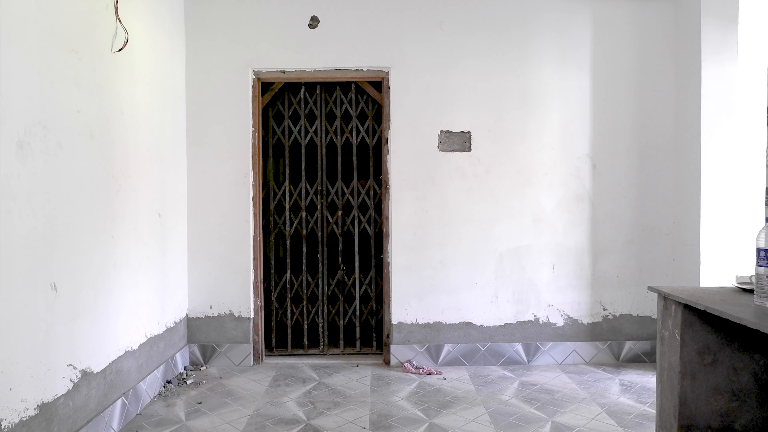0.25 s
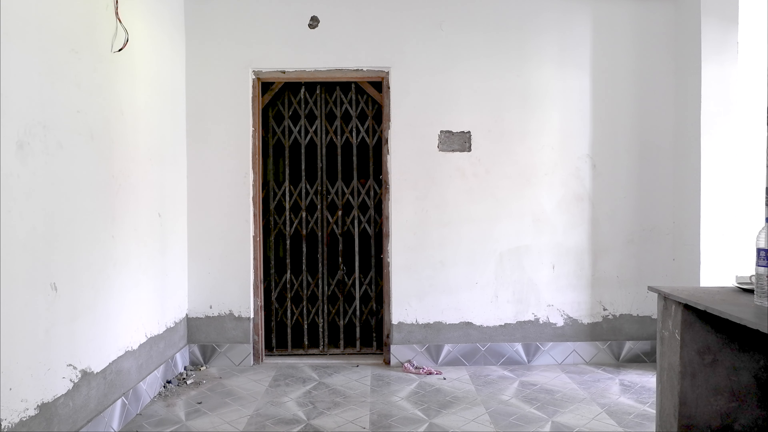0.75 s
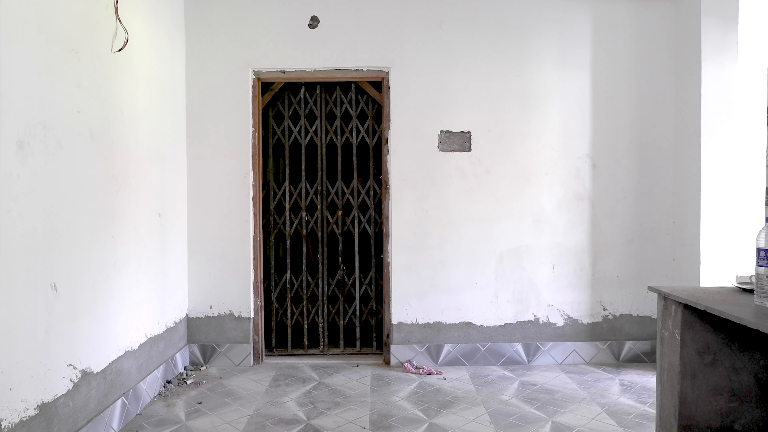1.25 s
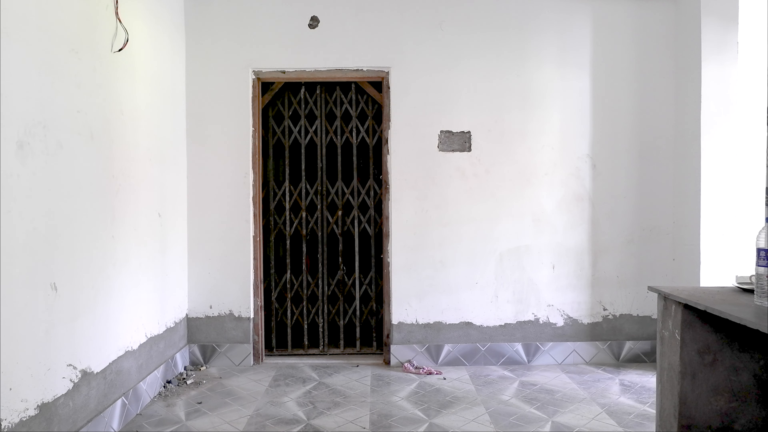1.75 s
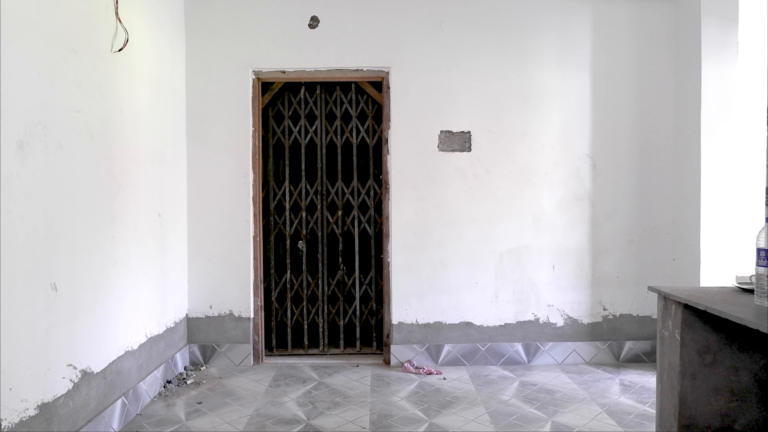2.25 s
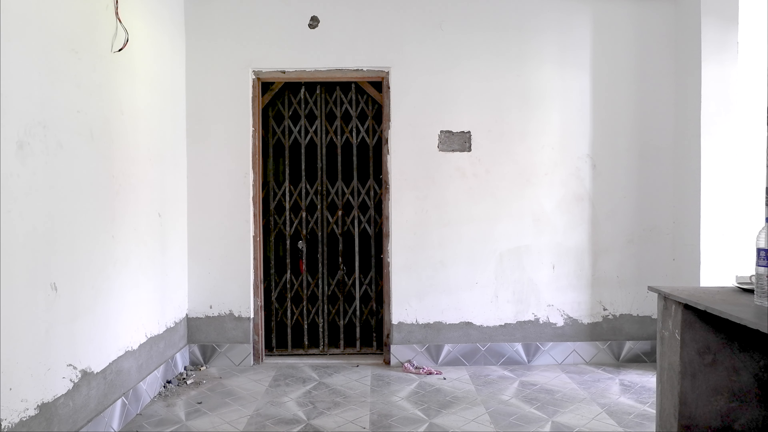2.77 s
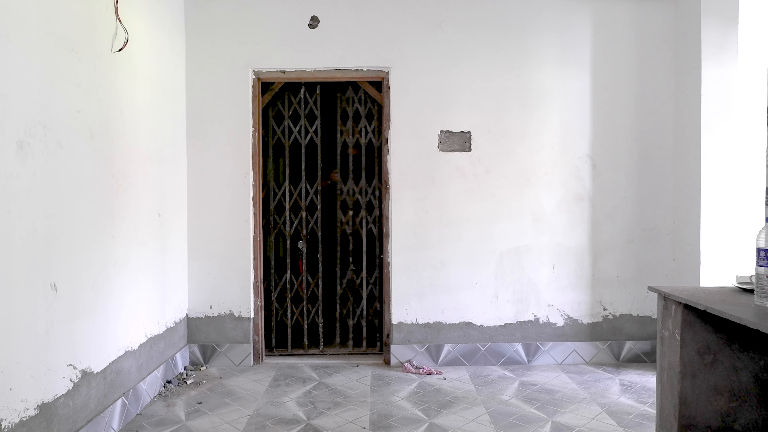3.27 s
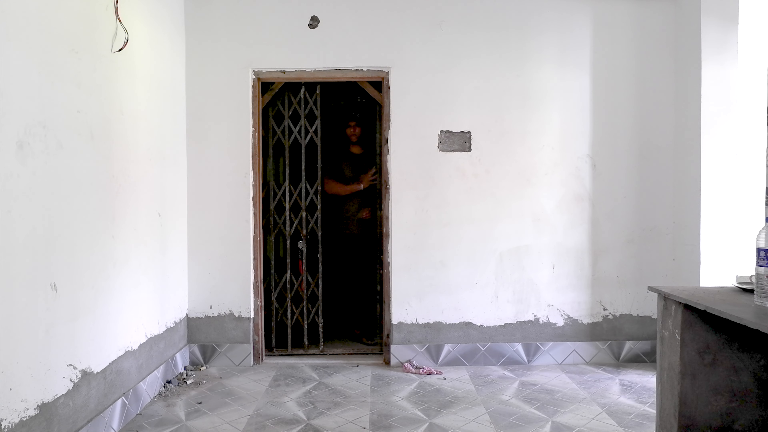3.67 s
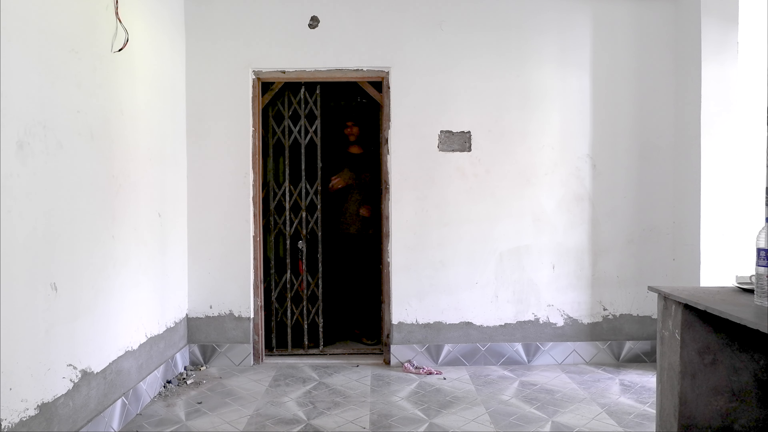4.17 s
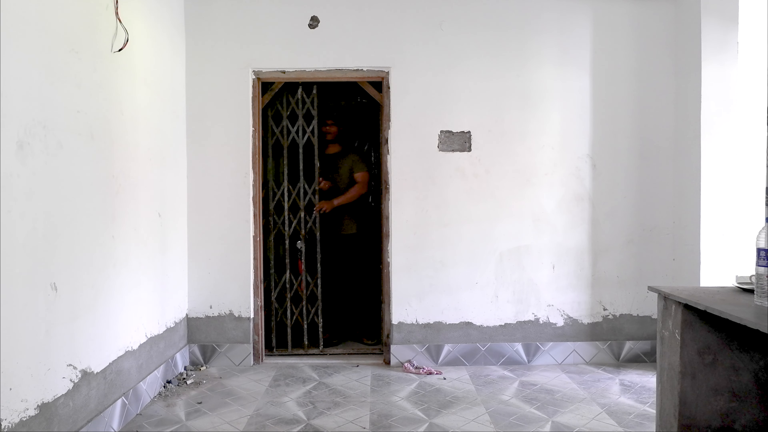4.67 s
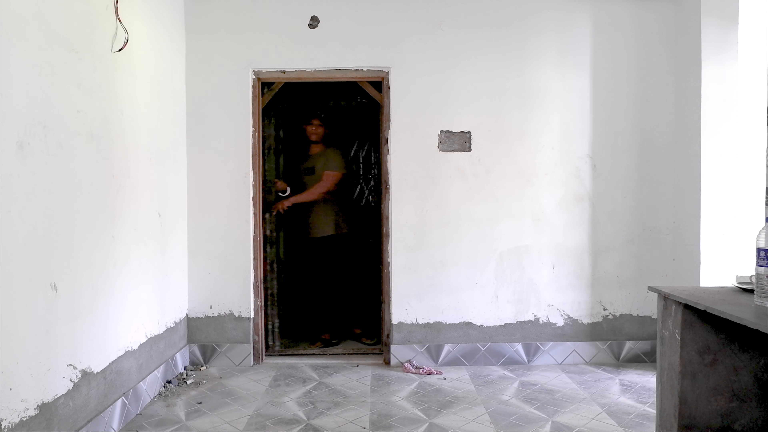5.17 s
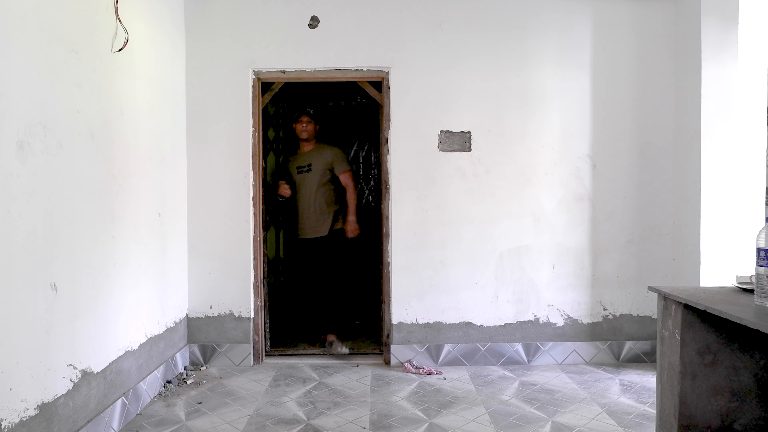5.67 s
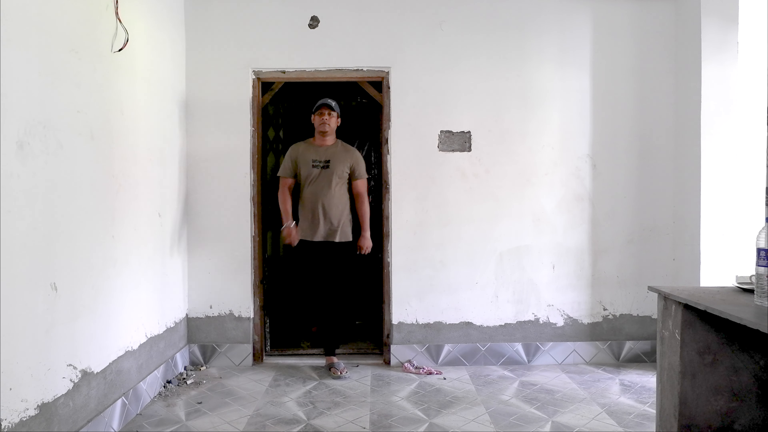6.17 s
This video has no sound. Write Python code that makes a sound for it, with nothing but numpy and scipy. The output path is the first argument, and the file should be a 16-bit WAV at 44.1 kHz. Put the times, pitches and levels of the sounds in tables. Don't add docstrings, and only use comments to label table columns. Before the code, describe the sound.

In a bare, hard-walled tiled room, a latch snaps with a bright metallic clack, followed by faint key ticks and pings. A bolt clacks, then a harder release bangs. After a lull, one leaf of a folding steel gate rattles along its rail and stops with a clank. The second leaf clatters louder, with a brief very high squeal, and slams. Light shoe scuffs end it. The stereo microphone stands back in the echoing room, over low hum and hiss.

```python
import sys
import numpy as np
from scipy import signal
from scipy.fft import rfft, irfft, next_fast_len
from scipy.io import wavfile
from scipy.ndimage import uniform_filter1d

SR = 44100
rng = np.random.default_rng(int(sys.argv[2]) if len(sys.argv) > 2 else 0)


def level_to_linear(level):
    exponent = np.asarray(level, float) / 20
    return 10 ** exponent


def wrap_up_sound(samples):
    columns = np.atleast_2d(samples).T
    tamed = np.clip(columns, -1, 1)
    steps = np.round(tamed * 32767).astype(np.int16)
    wavfile.write(sys.argv[1], SR, steps)


N = 283641

# frequency_hz, density_db
AIR_SPECTRUM = [(15, -71), (25, -26.5), (129, -6.5), (199, -6), (341, -8), (584, -9.5), (829, -11.5),
                (1000, -12), (1240, -15), (1460, -14.5), (1710, -17), (1860, -18), (3640, -21), (4060, -23),
                (15600, -33)]
# frequency_hz, side_minus_mid_db
AIR_SIDE = [(60, -16), (110, -23), (200, -29.5), (380, -20), (700, -17.5), (1290, -12.5), (2380, -8),
            (4400, -2.5), (8120, 1.5), (15000, 1.5)]
# frequency_hz, side_minus_mid_db
GATE_SIDE = [(60, -29), (250, -23), (700, -19), (2800, -25), (5600, -22), (10000, -17), (15000, -22)]
# frequency_hz, t60_s
ROOM_T60 = [(150, 1), (500, 0.84), (1300, 0.68), (3500, 0.65), (9000, 0.55), (16000, 0.42)]
# start_s, length_s, level_db, centre_hz
SCUFFS = [
    (6.052, 0.18, -57, 7500),
    (6.214, 0.083, -50.5, 6000),
]
# start_s, peak_db, pitch_hz, t60_s
RINGS = [ (.575, -49, 10155, .8), (.575, -55, 8255, 1.2), (.575, -62, 10710, 1.1), (.86, -62, 10105, .5),
         (.87, -61, 10710, .8), (1.44, -65, 10250, 1.4), (1.681, -50, 12155, .4), (1.681, -50, 8300, .3),
         (2.2, -54, 10220, .7), (2.482, -47, 10145, .4), (2.482, -51, 8260, .9), (3.589, -50, 8400, .3),
         (4.03, -52, 8660, .7), (4.854, -52, 7640, .5)]
# start_s, peak_db, pitch_hz, t60_s
CLANKS = [(3.64, -45, 163, .5), (3.72, -42, 118, .45), (3.925, -42, 116, .45), (4.09, -52, 125, .35),
          (5.045, -51, 1100, .25), (5.07, -43, 420, .35), (5.1, -50, 690, .35), (5.19, -48, 270, .25),
          (5.26, -47, 335, .35), (5.46, -46, 1080, .35), (5.5, -53, 120, .6)]

SLAMS = [
    (0.1185, -27, 2440, -2),
    (0.1323, -22.5, 3020, -27),
    (1.6716, -35.5, 2750, -39),
    (1.6811, -24.5, 3750, -54),
    (1.889, -37.5, 3170, -40),
    (2.004, -30, 3484, -22),
    (2.0113, -18.5, 3070, -11.5),
    (2.039, -32.5, 4200, -28),
    (3.8119, -25.5, 3350, -15),
    (5.475, -29, 2850, -11.5),
]
CLICKS = [ (0.4062, -49.5, 2440, 4), (0.414, -41.5, 4740, -42), (0.5787, -39, 4260, -32),
          (0.9267, -42.5, 3720, -9), (2.2002, -35, 3830, -1), (2.481, -50, 3670, 8),
          (3.5898, -30, 3750, -21), (4.0693, -54.5, 2540, 8), (4.8297, -41, 3780, -22),
          (4.8533, -45.5, 3980, 0), (5.0485, -33.5, 4240, -39), (5.105, -34.5, 3350, -12),
          (5.3116, -36.5, 3220, 5), (5.4552, -26.5, 5650, -23), (5.793, -49.5, 2960, -18)]
KNOCKS = [
    (2.37, -44, 5400, 4.5),
    (3.39, -48, 2660, -30),
    (4.4, -49.5, 1300, 7),
    (3.86, -40.5, 3700, -20),
    (6.235, -54, 2700, 3),
]
TAPS = [
    (.82, -51.5, 4240, -14),
    (.861, -56, 4225, 3),
    (0.891, -53, 4200, -12),
    (.93, -43, 4240, -28),
    (1.126, -54.5, 4680, -29),
    (1.17, -54.5, 4160, -15),
    (1.219, -61, 4630, -27),
    (3.135, -51.5, 4930, -30),
    (3.17, -46.5, 4160, -23),
    (5.793, -46.5, 4330, -4),
]
THUDS = [
    (2.035, -37, 4220, -40),
    (5.09, -50, 4270, -34),
    (5.4, -32.5, 2960, -7),
]
LATCHES = [
    (0.1225, -36.5, 2930, 7),
    (0.128, -27.5, 2700, -40),
    (.416, -48, 4970, -40),
    (0.443, -46, 2430, -40),
    (.59, -43.5, 2485, -40),
]
TOUCHES = [
    (0.073, -47.5, 6250, 4),
    (.098, -41.5, 3000, 3),
    (0.553, -43.5, 3900, -18),
    (1.652, -56.5, 4230, 4),
    (1.981, -38.5, 3970, -12),
    (4.79, -49.5, 4060, -10),
]

# time_s, level_db
SLIDES = [
    [(.41, -51.5), (.56, -57)],
    [(2.14, -40), (2.212, -41.5), (2.346, -43.5), (2.408, -39.5), (2.46, -63)],
    [(3.09, -65), (3.162, -55.5), (3.34, -47), (3.416, -40.5), (3.63, -38.5), (3.8, -42.5), (3.9, -44.5),
     (4.014, -55), (4.1, -81)],
    [(4.2, -53.5), (4.22, -52.5), (4.32, -62.5)],
    [(4.39, -49), (4.412, -47), (4.5, -53.5)],
    [(4.82, -48.5), (5.006, -49.5), (5.1, -33), (5.2, -39.5), (5.284, -35.5), (5.4, -36.5), (5.47, -47.5),
     (5.52, -60)],
    [(5.85, -65), (6.1, -63.5), (6.22, -59.5)],
]
# start_s, level_db
JOLTS = [
    (3.584, -42),
    (3.809, -27.5),
    (5.094, -41),
    (5.22, -30.5),
    (5.388, -25.5),
]
FOLDS_S = [
    2.14,
    3.12,
    5.5,
]
# start_s, end_s, frame_db
LOADS = [
    (2.33, 2.42, -10),
    (3.37, 3.56, -7),
    (3.62, 3.74, -7),
    (3.82, 3.94, -11),
    (4.4, 4.467, -7),
    (5.03, 5.12, -11),
    (5.18, 5.32, -11),
    (5.39, 5.48, -7),
]
# start_s, end_s, level_db
BOOMS_FIRST = [
    (3.6, 3.93, -53.5),
]
# start_s, end_s, level_db
BOOMS_SECOND = [
    (5.04, 5.147, -46.5),
    (5.201, 5.327, -49.5),
    (5.39, 5.466, -54.5),
]
# frequency_hz, width_hz, level_db
RAIL_FIRST = [(138, 30, -0.5), (353, 210, 0)]
# frequency_hz, width_hz, level_db
RAIL_SECOND = [(110, 15, 0.81), (330, 37, -0.85), (403, 130, -0.6), (694, 140, 0.17)]
# frequency_hz, width_hz, level_db
LATTICE = [(2700, 660, -4.5), (4600, 430, -2.5)]
# frequency_hz, density_db
RATTLE = [(940, -57), (1600, -12), (2000, -3), (2320, -3.5), (2710, 2), (3590, 5), (4450, 8), (5520, 9),
          (8000, 6), (10400, -14), (17600, -120)]

SUPPRESS_DB = 8.5
LOAD_RISE_S, LOAD_FALL_S = 0.02, 0.016


def level(x, db):
    return x * level_to_linear(db) / np.sqrt(np.mean(x ** 2))


def on_log(table, hz):
    f, v = np.transpose(table)
    return np.interp(np.log(np.maximum(hz, 1)), np.log(f), v)


def colour(x, gain):
    size = next_fast_len(x.shape[-1])
    spectrum = rfft(x, size) * gain(np.fft.rfftfreq(size, 1 / SR))
    return irfft(spectrum, size)[..., :x.shape[-1]]


def hump(hz, centre_hz, octaves):
    distance = np.log2(np.maximum(hz, 1) / centre_hz)
    return np.exp(-.5 * (distance / octaves) ** 2)


def resonances(table, base_db):
    def gain(hz):
        modes = [level_to_linear(db) / np.sqrt(1 + (2 * (hz - f) / width) ** 2) for f, width, db in table]
        return level_to_linear(base_db) + sum(modes)
    return gain


def since(s):
    t = np.arange(N) / SR - s
    return np.where(t >= 0, t, np.inf)


def air():
    noise = rng.standard_normal((2, N))
    modes = resonances([(191, 4.0, 15), (303, 6.5, 0.5)], 0)
    hum_and_hiss = colour(noise, lambda f: level_to_linear(on_log(AIR_SPECTRUM, f)) * modes(f))
    return level(hum_and_hiss, -61 + SUPPRESS_DB)


def echo(direct_db, rise_s=0.0013, early_db=3, early_s=0.0045):
    hz, s, spec = signal.stft(rng.standard_normal(SR), SR, nperseg=512)
    decay = level_to_linear(-60 * s / on_log(ROOM_T60, hz)[:, None])
    tail = signal.istft(spec * decay, SR, nperseg=512)[1]
    t = np.arange(len(tail)) / SR
    tail *= (1 - np.exp(-t / rise_s)) * (1 + level_to_linear(early_db) * np.exp(-t / early_s))
    tail /= np.sqrt(np.sum(tail ** 2))
    tail[0] += level_to_linear(direct_db)
    return tail


def shoe(octaves=0.6):
    out, t = np.zeros(N), np.arange(N) / SR
    for s, length_s, db, hz in SCUFFS:
        grit = colour(rng.standard_normal(N), lambda f: hump(f, hz, octaves))
        out += level(grit, db) * np.sin(np.pi * np.clip((t - s) / length_s, 0, 1))
    return out


def squeal(start_s=5.359, rise_s=.05, hold_s=0.052, t60_s=.06, sag_db_per_s=50):
    t = np.arange(N) / SR - start_s
    fade = np.maximum(-t / rise_s, np.maximum(t - hold_s, 0) / t60_s)
    db = -29.5 - sag_db_per_s * np.maximum(t, 0) - 60 * fade
    throb = 1 + 0.54 * np.cos(2 * np.pi * 57 * t)
    return np.sqrt(2) * level_to_linear(db) * throb * np.sin(2 * np.pi * 14950 * t)


def rings(table, push_s, grip_s):
    out, t = np.zeros(N), np.arange(SR) / SR
    for s, db, hz, t60_s in table:
        i = int(s * SR)
        age = t[:N - i]
        swing = level_to_linear(db - 60 * age / t60_s) * (1 - np.exp(-age / push_s))
        swing *= 1 / 3 + 2 / 3 * np.exp(-age / grip_s)
        mode = np.sin(2 * np.pi * hz * age)
        twin = 0.54 * np.sin(2 * np.pi * 1.003 * hz * age)
        out[i:i + SR] += swing * (mode + twin) / 1.2
    return out


def chatter(t, contact_s):
    envelope = np.sqrt(t * np.exp(-t / contact_s))
    x = rng.standard_normal(len(t))
    for _ in range(4):
        spec = rfft(x * envelope)
        x = irfft(spec / np.abs(spec), len(t))
    return x * envelope


def blows(table, frame_db, octaves, frame_hz, contact_s):
    out, t = np.zeros(N + 4096), np.arange(4096) / SR
    for s, db, hz, pins_db in table:
        force = chatter(t, contact_s)
        bars = colour(force, lambda f: hump(f, hz, octaves) / (1 + (1700 / (f + 1)) ** 6))
        frame = colour(force, lambda f: hump(f, frame_hz, 0.74))
        pins = colour(force, lambda f: hump(f, 8100, 0.55))
        i = int(s * SR)
        blow = level(bars, 0) + level(frame, frame_db) + level(pins, pins_db)
        out[i:i + 4096] += level_to_linear(db - 10) * blow
    return out[:N]


def all_blows():
    return (blows(SLAMS, frame_db=-20.5, octaves=0.86, frame_hz=1290, contact_s=.0025)
            + blows(CLICKS, frame_db=-15.5, octaves=0.44, frame_hz=1360, contact_s=0.0024)
            + blows(KNOCKS, frame_db=1.5, octaves=0.76, frame_hz=1540, contact_s=0.0067)
            + blows(TAPS, frame_db=-45, octaves=0.14, frame_hz=1360, contact_s=0.0021)
            + blows(THUDS, frame_db=-4.5, octaves=0.92, frame_hz=840, contact_s=0.0046)
            + blows(LATCHES, frame_db=-39, octaves=0.29, frame_hz=1360, contact_s=0.0024)
            + blows(TOUCHES, frame_db=-36, octaves=0.61, frame_hz=1360, contact_s=0.009))


def load(table, rise_s):
    t = np.arange(N) / SR
    out = np.zeros(N)
    for start_s, end_s, db in table:
        ramp = np.minimum((t - start_s) / rise_s, (end_s - t) / LOAD_FALL_S + 1)
        out += level_to_linear(db) * np.clip(ramp, 0, 1)
    return out


def pulling(jolt_t60_s=0.14):
    t = np.arange(N) / SR
    pull = np.zeros(N)
    for rows in map(np.array, SLIDES):
        inside = (t >= rows[0, 0]) & (t <= rows[-1, 0])
        pull += inside * level_to_linear(np.interp(t, rows[:, 0], rows[:, 1]))
    shake = sum(level_to_linear(db - 60 * since(s) / jolt_t60_s) for s, db in JOLTS)
    return uniform_filter1d(pull, size=441) + uniform_filter1d(shake, size=221)


def joint_force(clicks_per_s=1500, scatter_db=4.5, scrape_db=-4):
    chance = rng.random((3, N))
    strength = level_to_linear(-scatter_db * np.log(np.maximum(chance[1], .03)))
    clicks = (chance[0] < clicks_per_s / SR) * strength * np.sign(chance[2] - .5)
    return level(clicks, 0) + level(rng.standard_normal(N), scrape_db)


def rail_boom(force):
    first = colour(force, lambda f: resonances(RAIL_FIRST, -60)(f) ** 2)
    second = colour(force, lambda f: resonances(RAIL_SECOND, -60)(f) ** 2)
    boom = level(first, 1) * load(BOOMS_FIRST, 0.044) + level(second, -2) * load(BOOMS_SECOND, LOAD_RISE_S)
    return colour(boom, lambda f: 1 / (1 + (95 / (f + 1)) ** 8))


def lattice_rattle(force, lift_db=-3):
    age = np.min([since(s) for s in FOLDS_S], axis=0)
    pull = pulling()
    body = colour(force, lambda f: level_to_linear(on_log(RATTLE, f)))
    bars = colour(body, lambda f: 1 / (1 + (f / 3600) ** 6))
    weight = level_to_linear(-2.5 - 19.5 * np.exp(-age / 0.063))
    body = weight * level(bars, lift_db) + np.sqrt(1 - weight ** 2) * level(body - bars, lift_db)
    pins = level_to_linear(-5) * (np.maximum(pull, 1e-5) / level_to_linear(-47)) ** -0.89
    pins = np.minimum(pins, level_to_linear(-2)) * level_to_linear(-13 * np.exp(-age / 0.058))
    high = level(colour(force, lambda f: hump(f, 9500, 0.8)), lift_db)
    frame = level_to_linear(-39) + load(LOADS, LOAD_RISE_S)
    low = colour(force, lambda f: hump(f, 1100, 0.19) + level_to_linear(-5.5) * hump(f, 1580, 0.4))
    return pull * (body + frame * level(low, lift_db) + pins * high)


def scene():
    force = joint_force()
    steel = all_blows() + lattice_rattle(force)
    tones = rings(RINGS, push_s=.001, grip_s=.05) + rings(CLANKS, push_s=.012, grip_s=.3)
    whistle = squeal()
    gate = colour(steel, resonances(LATTICE, -3.7)) + rail_boom(force)
    gate = gate + level_to_linear(-8) * whistle + shoe() + level_to_linear(-5) * tones
    mid, side = air()
    mid = mid + tones + whistle + signal.fftconvolve(gate, echo(direct_db=-9))[:N]
    across = tones + whistle + signal.fftconvolve(gate, echo(direct_db=-35))[:N]
    side = colour(side, lambda f: level_to_linear(on_log(AIR_SIDE, f)))
    side = side + colour(across, lambda f: level_to_linear(on_log(GATE_SIDE, f)))
    return np.array([mid + side, mid - side])


def top_cut(x):
    return signal.sosfilt(signal.butter(12, 15750, fs=SR, output="sos"), x)


def record(dry):
    spec = signal.stft(dry, nperseg=1024, noverlap=768)[2]
    power = np.mean(np.abs(spec) ** 2, axis=0)
    power = uniform_filter1d(power, size=7, axis=1)
    power = uniform_filter1d(power, size=11, axis=0)
    quiet = np.percentile(power, 10, axis=1, keepdims=True)
    gain = np.clip(1 - 1.51 * quiet / power, level_to_linear(-SUPPRESS_DB), 1)
    clean = signal.istft(spec * gain, nperseg=1024, noverlap=768)[1][:, :N]
    clean = colour(clean, lambda f: f < 15750)
    return top_cut(clean)


dry = scene()
out = record(dry)
wrap_up_sound(out)
```